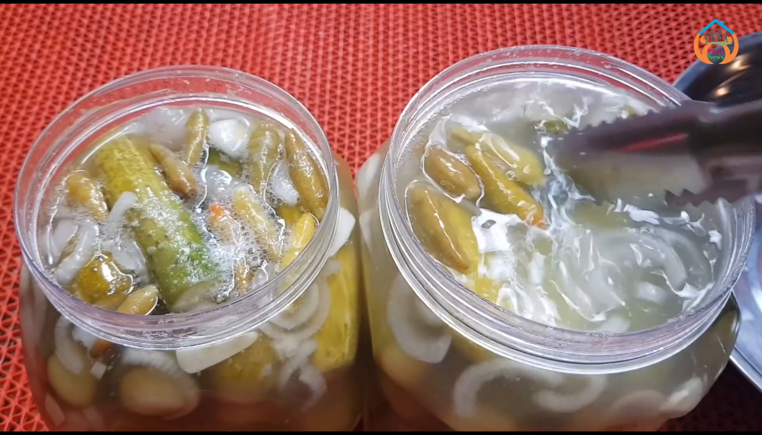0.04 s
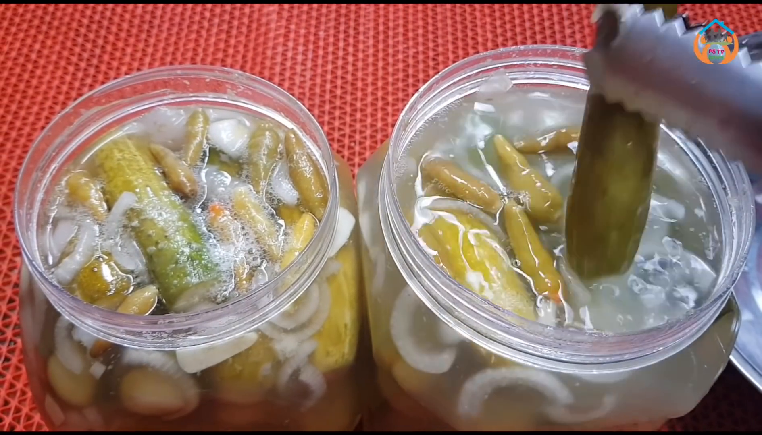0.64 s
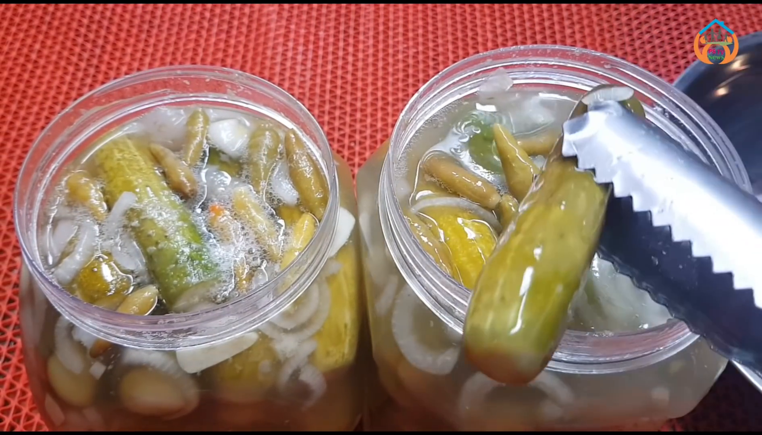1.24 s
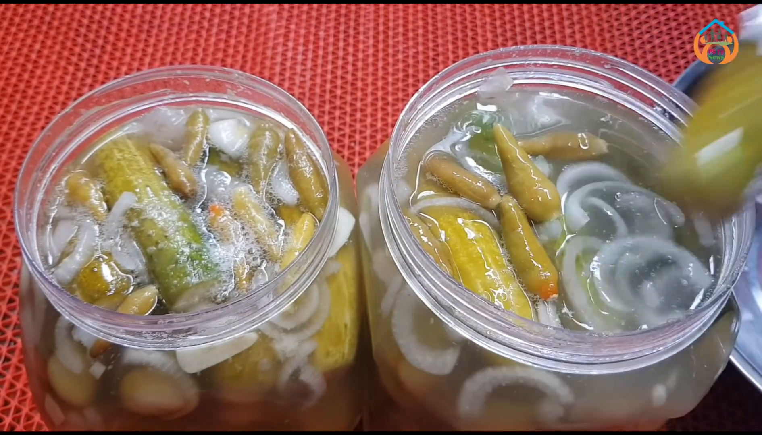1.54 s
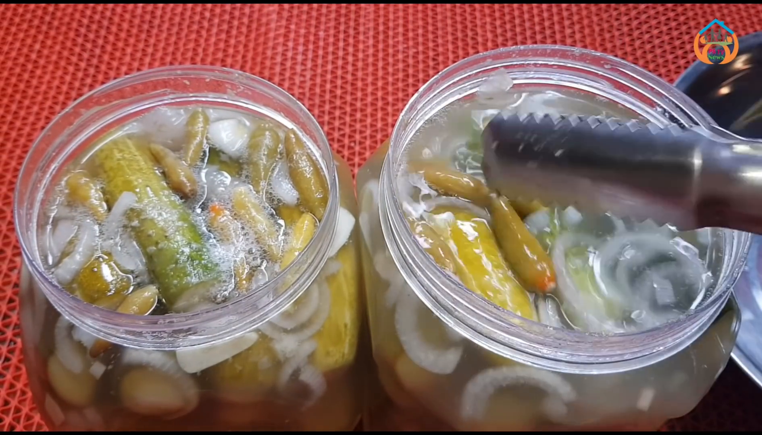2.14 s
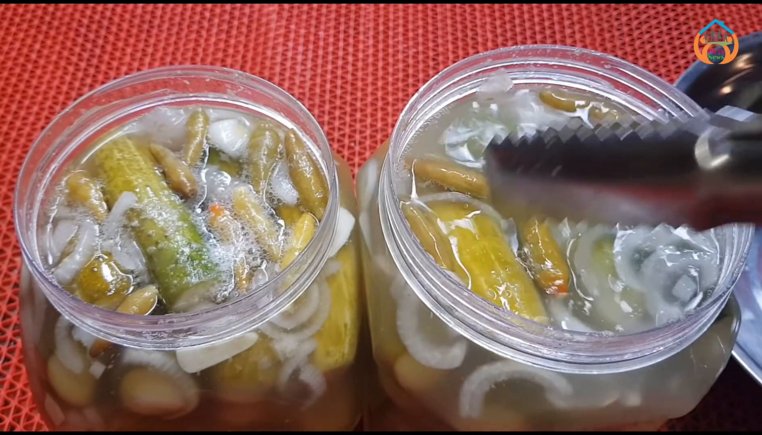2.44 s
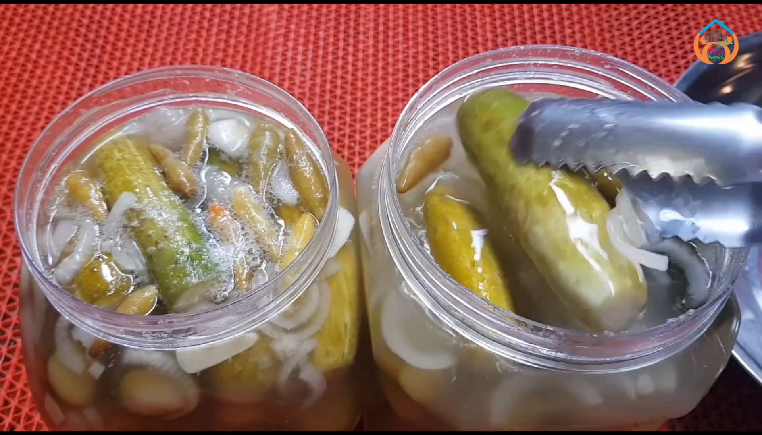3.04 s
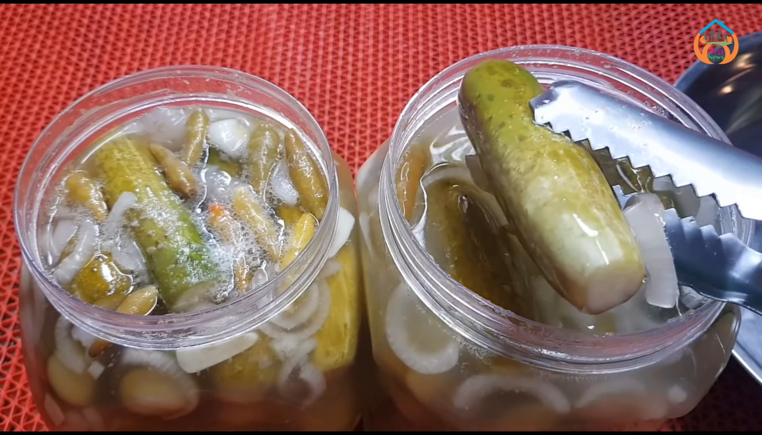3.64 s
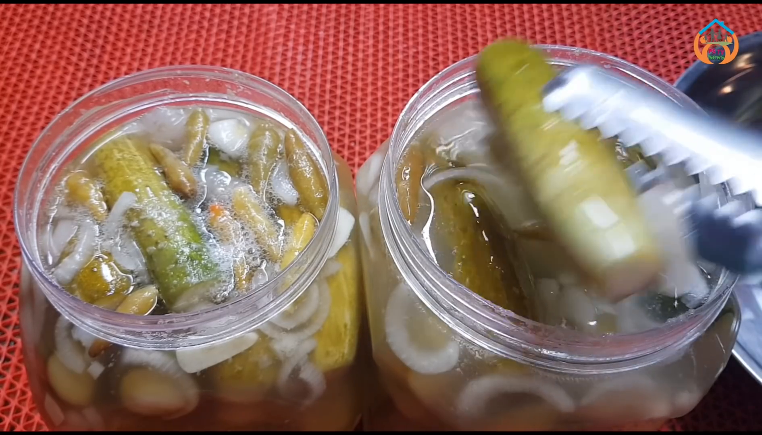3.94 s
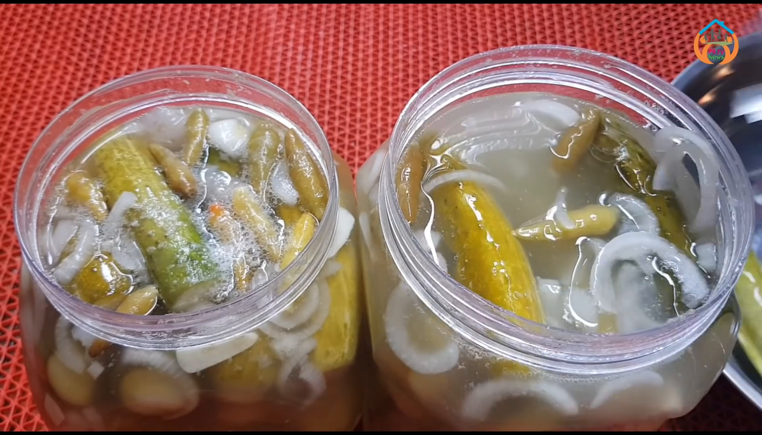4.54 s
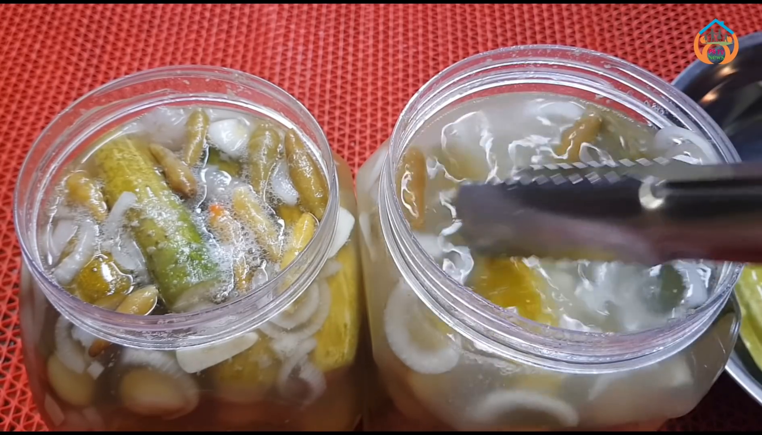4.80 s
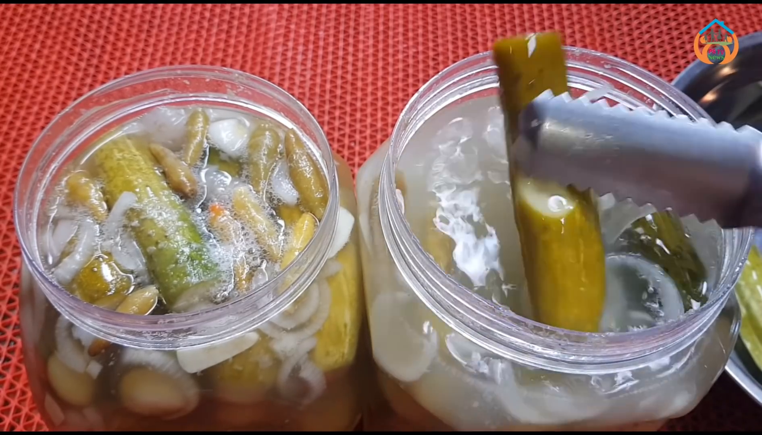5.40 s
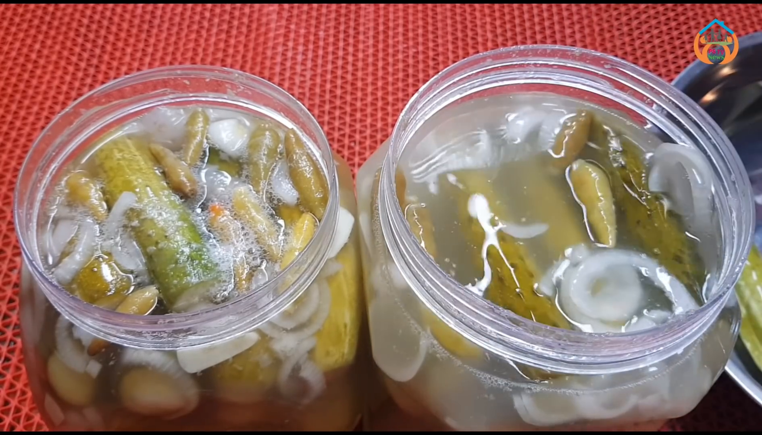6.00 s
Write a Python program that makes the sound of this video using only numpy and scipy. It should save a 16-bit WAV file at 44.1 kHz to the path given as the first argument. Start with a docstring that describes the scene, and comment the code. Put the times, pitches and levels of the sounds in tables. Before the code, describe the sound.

In a small kitchen, brine sloshes softly and pops with little bubbles as metal tongs stir a plastic jar, ticking now and then. Drips patter as pickles are lifted out. One drops into a metal dish about two seconds in, another past the middle and a third at the very end, each with a slap, thud and brief ring. The stereo microphone is close, and an appliance hums low underneath.

```python
"""Brine laps, pops and drips as steel tongs fish pickled cucumbers out of a plastic jar on a kitchen table.
Pockets of air ring in the stirred brine and the wet skins fizz. The tongs click against each other and
the rim. Pickles drop into a metal dish beside the jar, each with a wet slap, a short ring of the metal
and a thud of the table. A close stereo microphone also hears the small room and a humming appliance."""
import sys
import numpy as np
from scipy import signal
from scipy.fft import rfft, irfft, next_fast_len
from scipy.io import wavfile
from scipy.ndimage import uniform_filter1d

SR = 44100
rng = np.random.default_rng(int(sys.argv[2]) if len(sys.argv) > 2 else 0)


def master_out(mix):
    """Clip the mix to full scale and print it as 16-bit PCM to the path in sys.argv[1]."""
    frames = np.transpose(np.atleast_2d(mix))
    ceiling = np.clip(frames, -1, 1)
    pcm = np.round(ceiling * 32767).astype(np.int16)
    wavfile.write(sys.argv[1], SR, pcm)


N = 276066
T = np.arange(N) / SR  # seconds since the scene began
SHORT_T = T[:15000]  # seconds within one short sound
TOP_HZ = 15700  # the microphone cuts off above this

# Levels in the tables are relative: the functions set how loud each layer ends up.
# how hard the brine is stirred: t/s, lapping level/dB, small bubble level/dB
STIRRING = [(0.0, -52.5, -43.5), (0.23, -50.5, -52), (0.7, -45.5, -46), (1.11, -48, -51.5),
            (1.36, -47.5, -50), (1.88, -51.5, -46.5), (2.02, -49.5, -50.5), (2.28, -56, -49),
            (2.58, -53.5, -53.5), (2.88, -56.5, -51.5), (3.45, -52.5, -51.5), (3.89, -51.5, -50.5),
            (4.18, -45, -48.5), (4.41, -49, -46.5), (4.64, -58, -49), (5.02, -50.5, -53.5),
            (5.19, -51, -51.5), (5.3, -56.5, -54), (5.58, -54, -54.5), (6.08, -52.5, -56.5),
            (6.26, -54, -50)]
# how much the wet skins fizz: t/s, level/dB
FIZZ_LEVEL = [(0, -57), (0.11, -54), (0.22, -62.5), (0.4, -60.5), (0.5, -58), (0.78, -59.5), (0.93, -56),
              (1.22, -60.5), (1.57, -59), (1.65, -58), (1.76, -62), (2.0, -58), (2.12, -66), (2.3, -62.5),
              (2.6, -62), (2.78, -65), (3.0, -66), (3.12, -62.5), (3.36, -68.5), (3.45, -62), (3.55, -67),
              (3.8, -62), (4.1, -59.5), (4.27, -61), (4.5, -56), (4.66, -71), (4.95, -63.5), (5.5, -66.5),
              (6.26, -62.5)]
# tone of the lapping, the small bubbles and the fizz: f/Hz, level/dB
LAP_TONE = [(100, -22.5), (190, -6), (350, -5.5), (550, -4.5), (800, -10.5), (1300, -13.5), (3000, -83)]
BUBBLE_TONE = [(400, 4), (650, 5), (780, 8.5), (970, -0.5), (1150, 3), (1650, 2.5), (2150, 2.5),
               (2650, 0.5), (3400, -1), (5000, -3.5), (7000, -15), (10000, -21.5)]
FIZZ_TONE = [(1500, -15), (4000, -15.5), (7000, 1.5), (8300, -3), (10500, 0.5), (13000, -1.5), (15000, -7),
             (15800, -45)]
# tone of the appliance's rumble: f/Hz, level/dB
RUMBLE_TONE = [(20, -40), (35, -8.5), (55, 3.5), (85, 1), (130, -4.5), (175, -7.5), (230, -15.5),
               (400, -21), (1000, -47.5)]
# how its hum and rumble swell and sink: t/s, level/dB
APPLIANCE_LEVEL = [(0.0, -36.5), (0.61, -38), (0.66, -44), (0.82, -34), (1.13, -35), (1.24, -42),
                   (1.27, -36.5), (2.04, -37.5), (2.09, -40.5), (3.68, -41.5), (4.46, -34.5), (4.51, -43.5),
                   (6.19, -42.5), (6.26, -35)]
# the clearest gulps, bubbles and drips: t/s, f/Hz, level/dB, time scale/s, spray against bubbles/dB
SPLASHES = [(0.005, 5230, -38.5, 0.0053, 2.5), (0.053, 750, -39.5, 0.004, -10),
            (0.054, 3230, -48, 0.006, 5), (0.097, 1940, -41.5, 0.0065, -3), (0.119, 4620, -40, 0.0069, -13),
            (0.187, 736, -43, 0.0028, 1), (0.202, 1390, -37, 0.005, 6), (0.297, 1000, -40, 0.0055, 15),
            (0.319, 3100, -40, 0.0073, 11), (0.333, 700, -43, 0.008, -10), (0.372, 5200, -42.5, 0.0062, 6),
            (0.445, 1380, -34, 0.0083, 23), (0.468, 5870, -38.5, 0.0037, -8), (0.475, 850, -33, 0.0038, -2),
            (0.472, 7050, -45, 0.004, -11), (0.477, 2070, -41, 0.003, 12), (0.488, 5400, -39, 0.0085, 7),
            (0.518, 4400, -40, 0.004, 5), (0.537, 700, -35, 0.006, 16), (0.557, 2310, -38, 0.0046, 3),
            (0.583, 700, -36, 0.0057, 7), (0.611, 2570, -42, 0.0045, 6), (0.693, 6500, -42, 0.005, -9),
            (0.734, 5290, -47, 0.0025, -4), (0.764, 1060, -35.5, 0.0044, 2),
            (0.777, 5040, -40.5, 0.011, 14), (0.847, 2080, -45.5, 0.005, -15), (0.906, 1210, -39, 0.005, 9),
            (0.907, 2770, -34, 0.0046, 14), (1.008, 710, -35, 0.005, -11), (1.009, 2840, -45, 0.003, 0),
            (1.026, 6900, -42.5, 0.0053, -12), (1.05, 725, -30.5, 0.0065, -6),
            (1.053, 1900, -41.0, 0.005, 6), (1.095, 2110, -36, 0.007, 3), (1.112, 1330, -39, 0.0049, 8),
            (1.124, 5750, -42, 0.006, 2), (1.176, 2130, -31, 0.0029, -14), (1.203, 2530, -44, 0.003, 14),
            (1.305, 3240, -39, 0.006, -8), (1.325, 6440, -49, 0.0044, -2), (1.377, 4380, -36, 0.0059, -1),
            (1.425, 1990, -37.5, 0.0037, 18), (1.427, 790, -40, 0.008, 10), (1.459, 2460, -38, 0.0046, 17),
            (1.49, 1550, -32.5, 0.004, 8), (1.567, 3300, -39.5, 0.0036, -7),
            (1.586, 2210, -38.5, 0.0026, -19), (1.628, 7580, -48, 0.004, -4),
            (1.646, 1090, -32, 0.0067, -25), (1.683, 2630, -28.5, 0.005, -12),
            (1.686, 3630, -31.5, 0.005, 16), (1.831, 6300, -47, 0.0035, -4), (1.841, 660, -31.5, 0.006, -2),
            (1.854, 1180, -39, 0.004, 0), (2.165, 4900, -50, 0.003, 0), (2.194, 5050, -51, 0.003, -1),
            (2.281, 2940, -43, 0.009, 1), (2.435, 2700, -44, 0.003, -3), (2.506, 2430, -42.5, 0.0066, 8),
            (2.587, 1140, -47, 0.0055, -8), (2.663, 4650, -49.5, 0.0036, -2),
            (2.707, 3120, -39.5, 0.0052, 2), (2.763, 1150, -46.5, 0.0041, -6),
            (2.809, 1150, -44, 0.0052, -1), (2.828, 2620, -43, 0.005, 8), (2.876, 1610, -38, 0.0072, 1),
            (2.899, 830, -36.5, 0.0035, 19), (3.01, 2440, -41.0, 0.017, 8), (3.08, 5600, -48, 0.0058, -7),
            (3.086, 4500, -42, 0.0037, 7), (3.092, 696, -46, 0.0031, -5), (3.149, 2720, -39, 0.004, -6),
            (3.179, 730, -42, 0.0042, -6), (3.222, 5070, -51, 0.0036, 2), (3.24, 2500, -38, 0.0083, -5),
            (3.349, 1750, -41, 0.0095, 9), (3.378, 840, -40.0, 0.0032, 2), (3.398, 3130, -36.5, 0.0068, 8),
            (3.413, 850, -33.5, 0.0057, 23), (3.435, 2800, -40, 0.006, 2), (3.467, 650, -40.5, 0.0031, -18),
            (3.508, 1470, -32.5, 0.008, -5), (3.577, 2400, -41.0, 0.0056, 2),
            (3.602, 5240, -47.5, 0.004, 0), (3.622, 4300, -48, 0.003, 4), (3.642, 4930, -46.0, 0.005, 14),
            (3.717, 1680, -39, 0.0042, -7), (3.778, 654, -39.5, 0.007, -1), (3.804, 2900, -35.5, 0.0054, 6),
            (3.859, 2600, -39, 0.006, 21), (3.86, 1570, -44, 0.004, -2), (3.876, 520, -40, 0.0055, -7),
            (3.974, 2300, -40.5, 0.004, -4), (3.982, 4960, -44, 0.0079, -11), (4.012, 1780, -34, 0.0037, 0),
            (4.035, 2510, -41, 0.01, 2), (4.036, 3720, -41.5, 0.006, 16), (4.061, 1560, -30, 0.004, 7),
            (4.083, 3170, -31.5, 0.0065, 5), (4.131, 2440, -28, 0.006, -3), (4.139, 750, -34, 0.0059, 2),
            (4.212, 2600, -30, 0.0042, 14), (4.235, 4070, -32.5, 0.0067, -1), (4.261, 2180, -39, 0.005, -9),
            (4.282, 2580, -36.5, 0.0057, 9), (4.4, 3000, -38.5, 0.004, 1), (4.403, 770, -38.5, 0.0051, -3),
            (4.678, 2930, -37, 0.0071, -5), (4.838, 4430, -41, 0.0044, -19), (4.88, 2560, -41, 0.0053, 6),
            (4.912, 1150, -41, 0.0058, 10), (4.934, 2040, -37.5, 0.005, 5), (5.046, 735, -44, 0.005, -12),
            (5.061, 438, -38.5, 0.004, 6), (5.07, 2540, -39, 0.0088, 0), (5.12, 3120, -40, 0.005, 1),
            (5.134, 490, -40, 0.012, 2), (5.19, 328, -41.5, 0.012, -4), (5.205, 400, -43.5, 0.013, 2),
            (5.225, 450, -46, 0.006, -3), (5.386, 2150, -48.5, 0.004, -8), (5.412, 2200, -51, 0.0034, -2),
            (5.488, 2250, -44, 0.0071, 5), (5.519, 2310, -49, 0.004, 6), (5.574, 4630, -45, 0.0034, 16),
            (5.595, 2220, -46.5, 0.004, 5), (5.618, 4480, -49, 0.0035, 4), (5.633, 1900, -44.5, 0.0032, 3),
            (5.651, 1900, -49, 0.0043, -4), (5.755, 1900, -52, 0.003, -10), (5.774, 2050, -49, 0.0034, -12),
            (5.827, 4180, -45, 0.0036, -1), (5.877, 2000, -40, 0.0042, -12),
            (5.921, 2920, -44.5, 0.004, 13), (5.922, 6550, -47.5, 0.0034, 8),
            (5.968, 2200, -34.5, 0.0037, -7), (6.044, 2760, -38.5, 0.005, 4),
            (6.047, 6370, -47, 0.004, -10), (6.068, 3380, -40.5, 0.007, 10),
            (6.075, 7350, -47.5, 0.0044, 2), (6.141, 4670, -40, 0.0046, 2)]
# clicks of the tongs: t/s, level/dB, f/Hz, sharpness of the ring (Q), time to fade by 60 dB/s,
# share sent to the room/dB, lean to the right/dB
TONG_CLICKS = [(1.642, -46, 10000, 4.4, 0.15, 2.5, 3), (1.84, -51, 9000, 2, 0.044, 3, 2),
               (2.3306, -38.5, 4000, 20, 0.012, -17, 10), (2.475, -44, 9000, 3.9, 0.065, 3.5, 3),
               (2.723, -46, 4160, 13, 0.023, 0, 3), (4.209, -51, 5100, 5.8, 0.044, -6, 5),
               (4.774, -54.5, 6160, 7.8, 0.03, -7, 3.5), (4.986, -52.5, 5100, 3.3, 0.033, -10, 6),
               (5.316, -54, 5400, 11, 0.046, 4.5, 8)]
# pickles hitting the dish: t/s, level/dB, place (0 = wall, 1 = bottom), contact time/s,
# ring level/dB, thud level/dB, slap level/dB
LANDINGS = [(1.9337, 3, 0.03, 0.00051, -8, -8.5, -35), (1.94, 0, 0.03, 0.0002, 0.5, -9.5, -17),
            (1.953, -8, 0.1, 0.00011, 0.5, -19, -10.5), (1.9875, -0.5, 0.23, 0.00009, -5, -7.5, -7.5),
            (1.998, -3, 0.5, 0.00011, 0, -8, -15), (2.001, -9.5, 0.5, 0.00012, -17, 5, -8),
            (4.456, -15.5, 0.76, 0.00017, 2, 10.5, -7), (4.47, -3.5, 1, 0.00017, -6, -1, -12),
            (4.473, 4, 1, 0.000071, 0, -4.5, -12), (4.481, -10, 0.8, 0.000036, -6, 1.5, 1),
            (4.488, -11, 0.98, 0.00007, -9, 0.5, -2.5), (6.218, -24, 0.53, 0.00036, 0, 11.5, -22),
            (6.252, -0.5, 0.9, 0.00041, -4.5, -21, -25)]
# the notes the dish rings at: f/Hz, time to fade by 60 dB/s, level/dB when hit on wall, corner, bottom
DISH_NOTES = [(288, 0.18, 4, -15, -4), (388, 0.1, -10, -8, -7), (612, 0.22, -18, -1, -9),
              (830, 0.15, -2, -6, 3), (889, 0.08, 11, 6, 10), (938, 0.14, 4, -2, 9),
              (1015, 0.07, 2, 10, 13), (1072, 0.15, -2, 6, 12), (1116, 0.12, 2, -2, 8),
              (1228, 0.1, -15, 2, -1), (1320, 0.11, 10.5, 10, 1), (1378, 0.11, 3, 1, 12.5),
              (1440, 0.1, 9, 10, 7), (1503, 0.08, 4, -2, 9), (1632, 0.08, 3, 7, 12), (1688, 0.1, 6, 3, 12),
              (1775, 0.2, -11, 3, 5), (1852, 0.19, -13, -1, 10), (1916, 0.35, -16, -2, -4),
              (1992, 0.1, 1, 3, 3), (2175, 0.08, -11, -2, 6), (2335, 0.09, -12, -10, 0),
              (2385, 0.12, -10, -10, -2), (2452, 0.14, -17, -13, 0), (2505, 0.15, -20, -8, -8),
              (2588, 0.1, -16, -7, -4), (2820, 0.1, -15, -8, -5), (2932, 0.13, -19, -18, -2),
              (3235, 0.11, -16, -17, 0)]
# the notes the table top booms at: f/Hz, time to fade by 60 dB/s, level/dB
TABLE_NOTES = [(130.4, 0.32, -1.5), (174, 0.12, 4.5)]
# tone of the loaded dish's rattle, the table's thud and the wet skin's slap: f/Hz, level/dB
RATTLE_TONE = [(150, -18), (380, -23), (560, -40), (740, -16), (950, 4), (1080, 7.5), (1250, -2),
               (1420, -3), (1780, 3), (2100, -7.5), (3200, -8), (5000, -29), (12000, -63)]
THUD_TONE = [(35, -43), (70, -46), (125, 1.5), (180, 5.5), (240, 1), (340, 3), (480, -2), (800, -10),
             (3000, -89)]
SLAP_TONE = [(500, -65), (1500, 8), (3000, 5.5), (4100, 0.5), (4900, -1.5), (6200, 2), (8500, -8),
             (11500, -4.5), (15500, -20)]
# how the microphone's two sides differ in the treble: f/Hz, level of left over right/dB
MIC_TILT = [(1500, 0), (4500, -1), (6600, -3), (7700, -2), (8800, 8), (15000, 1.5)]


def gain(db):
    """Turn decibels into a number to multiply by."""
    return 10 ** (np.asarray(db) / 20)


def unit(x):
    """Scale to an average strength (rms) of 1."""
    return x / np.sqrt(np.mean(x ** 2))


def burst(x):
    """Give a short sound the energy of 15 ms at strength 1."""
    return x * np.sqrt(.015 * SR / np.mean(np.sum(x ** 2, axis=-1)))


def colour(x, points):
    """Shape the tone of x along a curve of (f/Hz, level/dB) points."""
    hz, db = np.transpose(points)
    n = 2 * next_fast_len(x.shape[-1] // 2 + 2048)
    bin_hz = np.arange(n // 2 + 1) * SR / n
    log_gain = np.log(gain(np.interp(np.log(bin_hz + 1), np.log(hz), db)))
    # this step keeps the filter from sounding before its input does
    cepstrum = irfft(log_gain) * np.r_[1, np.full(n // 2 - 1, 2), np.zeros(n // 2)]
    return irfft(rfft(x, n) * np.exp(rfft(cepstrum)))[..., :x.shape[-1]]


def resonate(x, hz, q):
    """Keep the part of x near one pitch; a higher q keeps a narrower part."""
    return signal.lfilter(*signal.iirpeak(min(hz, TOP_HZ), max(q, 1), fs=SR), x)


def fade(t60):
    """Die away by 60 dB in t60 seconds."""
    return np.exp(-np.log(1000) * SHORT_T / t60)


def noise(size, alike):
    """Left and right noise, from unrelated (alike = 0) to the same (alike = 1)."""
    mid, side = rng.standard_normal((2, size))
    return (np.sqrt(1 + alike) * mid + np.sqrt(1 - alike) * np.array([side, -side])) / np.sqrt(2)


def flicker(rate):
    """A smooth random curve that takes a new direction rate times a second."""
    step = int(SR / rate)
    stairs = np.repeat(rng.standard_normal(N // step + 1), step)
    return unit(uniform_filter1d(stairs, step)[:N])


def pan(x, right_db):
    """Lean a sound to the right."""
    return x * gain([[-right_db / 2], [right_db / 2]])


def from_right(x, lag_s):
    """Sound from the right reaches the left side a little later."""
    return np.array([np.pad(x[0], (int(lag_s * SR), 0))[:N], x[1]])


def add(out, start, x):
    """Mix x into out from start seconds on."""
    i = int(np.clip(start * SR, 0, N - 1))
    out[:, i:i + x.shape[-1]] += x[..., :N - i]


def echoes(x, t60, wet_db, build_s):
    """Many echoes, different on each side, build up and die away."""
    tail = rng.standard_normal((2, len(SHORT_T))) * fade(t60) * (1 - np.exp(-(SHORT_T / build_s) ** 2))
    tail /= np.sqrt(np.sum(tail ** 2, axis=1, keepdims=True))
    return gain(wet_db) * signal.fftconvolve(x, tail, axes=1)[:, :N]


def bubble(hz, cycles, glide, lag_s=0):
    """An air pocket rings for some cycles and rises in pitch as it nears the surface."""
    age = np.maximum(SHORT_T[:int(2 * cycles / hz * SR)] - lag_s, 0) * hz / cycles
    tone = np.sin(2 * np.pi * cycles * age * (1 + glide * age / 2))
    return tone * np.exp(-np.pi * age) * (1 - np.exp(-20 * age))


def swarm(low_hz, high_hz, cycles, spread_db, smear_t60, count):
    """Many bubbles, big and small, blurred by echoes inside the jar."""
    pops = np.zeros((1, N))
    for when, pitch, size in rng.random((count, 3)):
        hz = low_hz * (high_hz / low_hz) ** pitch
        strength = gain(spread_db * size ** 2) * np.sqrt(hz)
        add(pops, when * N / SR, strength * bubble(hz, cycles, glide=0.029))
    jar_echo = noise(len(SHORT_T), 0) * fade(smear_t60)
    return unit(signal.fftconvolve(pops, jar_echo, axes=1)[:, :N])


def brine(bubble_db=1.8, fizz_db=4.5):
    """Brine laps round the pickles; small bubbles burst and the wet skins spit in shared spurts."""
    times, lap_curve, bubble_curve = np.transpose(STIRRING)
    spurt_db = flicker(rate=34)
    lap_gain = gain(np.interp(T, times, lap_curve))
    bubble_gain = gain(np.interp(T, times, bubble_curve) + bubble_db + spurt_db)
    fizz_gain = gain(np.interp(T, *np.transpose(FIZZ_LEVEL)) + fizz_db + 1.5 * spurt_db)
    # each layer is a smooth wash of noise plus a swarm of bubbles
    gulps = noise(N, .65) + gain(-14) * swarm(250, 1100, cycles=3, spread_db=8, smear_t60=.07, count=400)
    bubbles = noise(N, 0) + swarm(1000, 7500, cycles=4, spread_db=10, smear_t60=.065, count=1600)
    fizz = noise(N, 0) + swarm(2900, 15600, cycles=5, spread_db=10, smear_t60=.07, count=1300)
    return (pan(lap_gain * unit(colour(gulps, LAP_TONE)), right_db=4.0)
            + pan(bubble_gain * unit(colour(bubbles, BUBBLE_TONE)), right_db=2.5)
            + pan(fizz_gain * unit(colour(fizz, FIZZ_TONE)), right_db=4.5))


def appliance(hum_hz=52.1, wander_hz=1.56, hum_db=-4):
    """A motor hums over a low rumble that comes through the table; both swell and sink."""
    wander = unit(colour(rng.standard_normal(N), [(2, 3.5), (6, -10.5), (30, -85)]))
    hum = np.sqrt(2) * np.sin(2 * np.pi * (hum_hz * T + wander_hz * np.cumsum(wander) / SR))
    rumble = unit(colour(noise(N, 1.0), RUMBLE_TONE))
    swell = gain(np.interp(T, *np.transpose(APPLIANCE_LEVEL)) - 0.95)
    return pan(rumble + gain(hum_db) * hum, right_db=1.5) * swell


def splash(hz, length_s, spray_db, attack_s=0.00041, jar_db=-9, jar_s=0.0086, count=4):
    """A splash traps a few bubbles of like size and throws a spray; the jar's wall adds an echo."""
    t = SHORT_T[:4096]
    pop = np.zeros((2, len(t)))
    cycles = 17.3 * (hz / 2490) ** 0.57  # smaller, higher bubbles ring for more cycles
    for k, (pitch, size, left, right) in enumerate(rng.standard_normal((count, 4))):
        i = int((.0005 + 1.6 * length_s * k / count) * SR)
        for side, path in enumerate((left, right)):
            ring = bubble(hz * np.exp(0.056 * pitch), cycles, glide=0.013, lag_s=abs(path) * 0.000386)
            pop[side, i:i + len(ring)] += gain(2 * size) * ring[:len(t) - i]
    spray = noise(len(t), 0.43) * (1 - np.exp(-t / attack_s)) * np.exp(-t / (2.4 * length_s))
    spray = resonate(resonate(spray, hz, q=1.47), hz, q=1.42)
    echo = noise(len(t), 0) * t * np.exp(-t / jar_s)
    echo = resonate(resonate(echo, hz, q=2.9), hz, q=2.9)
    return burst(burst(pop) + gain(spray_db + 1.5) * burst(spray) + gain(jar_db) * burst(echo))


def drips(level_db=-4.0):
    """Single gulps, bubbles and drips stand out from the brine, each a tiny splash."""
    out = np.zeros((2, N))
    for start, hz, db, length_s, spray_db in SPLASHES:
        add(out, start, gain(db) * splash(hz, length_s, spray_db))
    return pan(out, right_db=4.0) * gain(level_db)


def tongs(rim_db=-11, rim_hz=1700):
    """The steel jaws tick against each other and the rim, and the room echoes it."""
    direct, to_room = np.zeros((2, N)), np.zeros((2, N))
    for start, db, hz, q, t60, room_db, right_db in TONG_CLICKS:
        crack = noise(len(SHORT_T), 0.11) * fade(t60)
        ring = burst(resonate(crack, hz, q))
        tick = gain(-1.5) * burst(resonate(crack, hz=6500, q=1.4))
        rim = gain(rim_db) * burst(resonate(crack, rim_hz, q=1.7))
        click = pan(gain(db) * burst(ring + tick + rim), right_db)
        add(direct, start, click)
        add(to_room, start, gain(room_db) * click)
    return direct + echoes(to_room, t60=0.38, wet_db=-3.0, build_s=0.0019)


def struck_metal(place, contact_s, ring_db, phase, detune=0.0014):
    """The dish rings and rattles; where it is hit sets each note's strength, its load shifts the pitch."""
    hz, t60, *place_db = np.transpose(DISH_NOTES)
    strength = gain([np.interp(place, [0, .5, 1], note_db) for note_db in np.transpose(place_db)])
    loaded_hz = hz * (1 + detune * rng.standard_normal(len(hz)))
    notes = np.sin(2 * np.pi * loaded_hz[:, None] * SHORT_T + phase[:, :, None])
    ring = np.sum(notes * fade(t60[:, None]) * strength[:, None], axis=1)
    rattle = colour(noise(len(SHORT_T), 0.017) * (fade(0.02) + gain(-11) * fade(0.066)), RATTLE_TONE)
    metal = gain(ring_db - 15) * burst(ring) + gain(-22.5) * burst(rattle)
    push = SHORT_T[:512] * np.exp(-SHORT_T[:512] / (contact_s / 2))  # a longer push sounds duller
    return signal.fftconvolve(metal, push[None] / push.sum(), axes=1)[:, :len(SHORT_T)]


def table_thud():
    """The table under the dish gives a dull knock and booms at its own low notes."""
    knock = colour(noise(len(SHORT_T), 0.87) * (fade(0.039) + gain(-14.5) * fade(0.44)), THUD_TONE)
    boom = sum(gain(db) * np.sin(2 * np.pi * hz * SHORT_T) * fade(t60) for hz, t60, db in TABLE_NOTES)
    return burst(knock) + gain(-1) * burst(boom)


def wet_slap(squash_s=0.0028):
    """The slap swells while the skin squashes flat, then brine spatters off it."""
    shape = (fade(0.052) + gain(-10) * fade(0.09)) * (1 - np.exp(-SHORT_T / squash_s))
    return burst(colour(noise(len(SHORT_T), 0) * shape, SLAP_TONE))


def pickles_landing():
    """Soft pickles hit the dish: the metal rings, the table thuds and the wet skin slaps."""
    out = np.zeros((2, N))
    hz = np.transpose(DISH_NOTES)[0]
    # neighbouring notes start in opposite directions; high ones reach the two sides more out of step
    skew = 1.33 * np.minimum(hz / 1500, 1) ** 2 * rng.choice([-1, 1], len(hz))
    phase = np.pi * np.arange(len(hz)) + np.array([skew, -skew]) / 2
    for start, db, place, contact_s, ring_db, thud_db, slap_db in LANDINGS:
        metal = pan(struck_metal(place, contact_s, ring_db, phase), right_db=5.0)
        thud = pan(gain(thud_db - 23) * table_thud(), right_db=2.5)
        slap = pan(gain(slap_db - 20) * wet_slap(), right_db=5.5)
        add(out, start, gain(db) * (metal + thud + slap))
    return out


def scene(jar_lag_s=0.0004, dish_lag_s=0.00027):
    """Jar and dish stand to the right of the microphone in a small kitchen."""
    jar = from_right(drips(), jar_lag_s)
    dish = from_right(pickles_landing(), dish_lag_s)
    room = echoes(jar, t60=0.28, wet_db=-8.5, build_s=0.006)
    room += echoes(dish, t60=0.28, wet_db=-12, build_s=0.0015)
    room = colour(room, [(200, -3), (600, -3.5), (2500, 3), (8000, 3.0)])  # brighter echoes
    background = from_right(brine() + appliance(), jar_lag_s)
    return background + jar + tongs() + dish + room


def record(dry):
    """Each side of the microphone colours the treble; peaks are clipped and the highest pitches cut."""
    left = colour(dry[0], [(hz, db / 2) for hz, db in MIC_TILT])
    right = colour(dry[1], [(hz, -db / 2) for hz, db in MIC_TILT])
    top_cut = signal.ellip(10, .2, 80, TOP_HZ, fs=SR, output="sos")
    return signal.sosfilt(top_cut, np.clip([left, right], -1, 1))


dry = scene()
out = record(dry)
master_out(out)
```